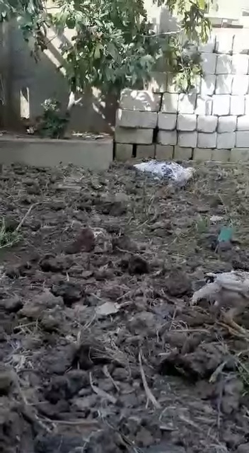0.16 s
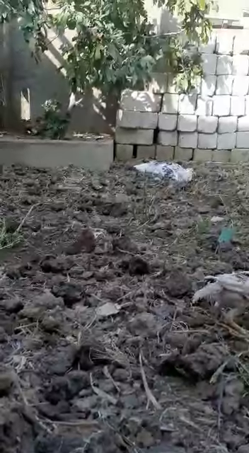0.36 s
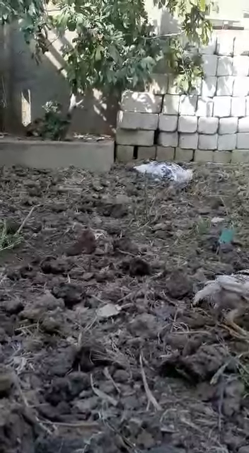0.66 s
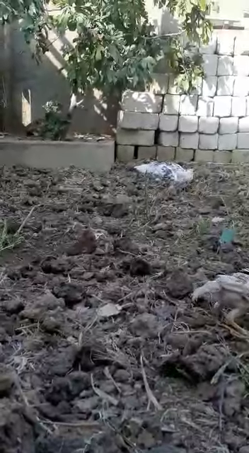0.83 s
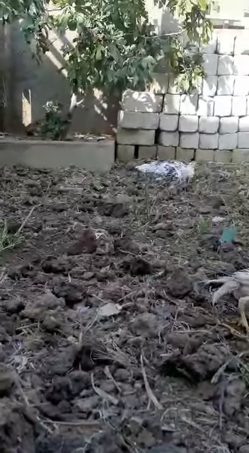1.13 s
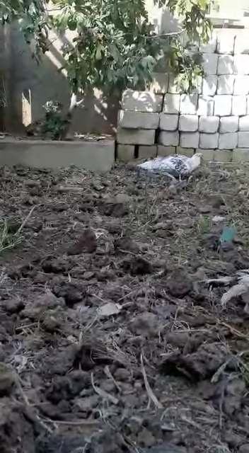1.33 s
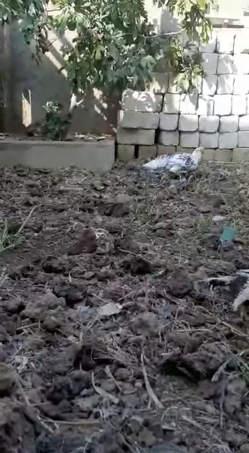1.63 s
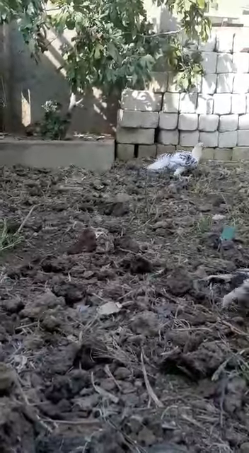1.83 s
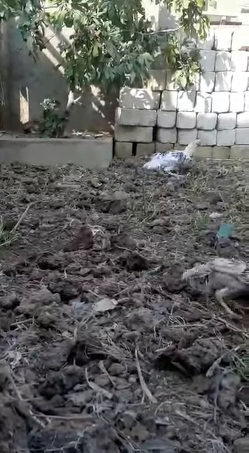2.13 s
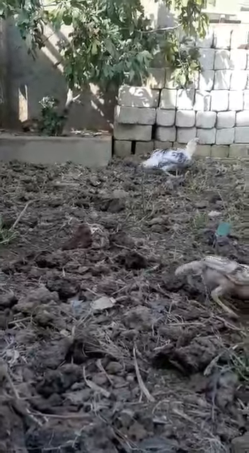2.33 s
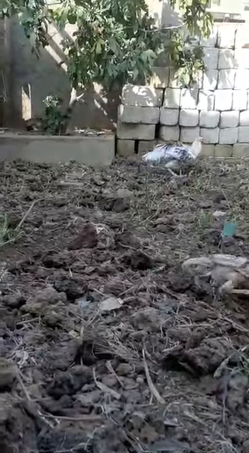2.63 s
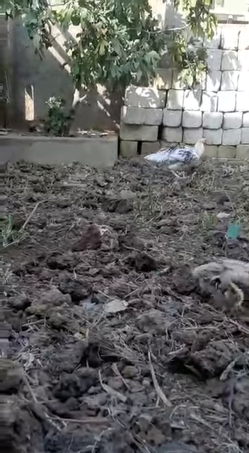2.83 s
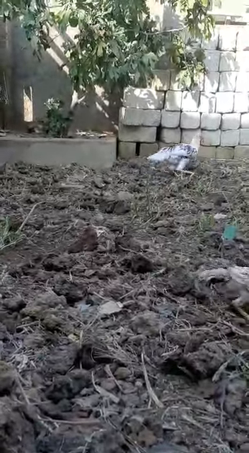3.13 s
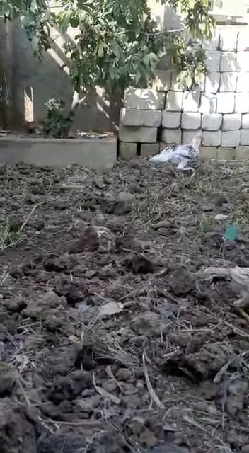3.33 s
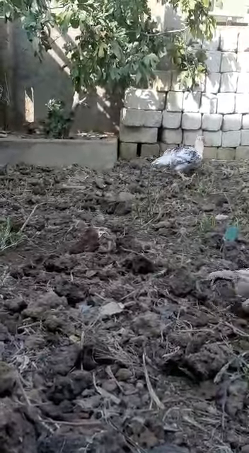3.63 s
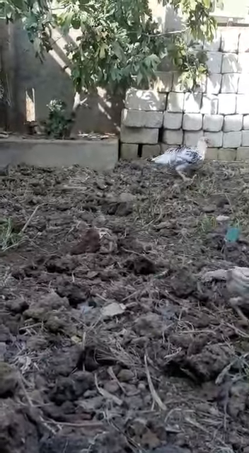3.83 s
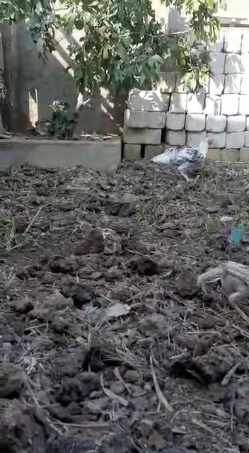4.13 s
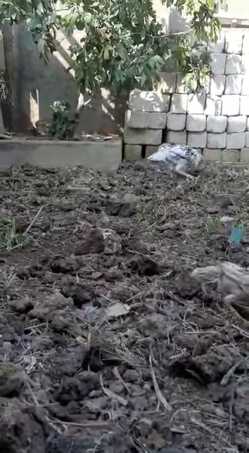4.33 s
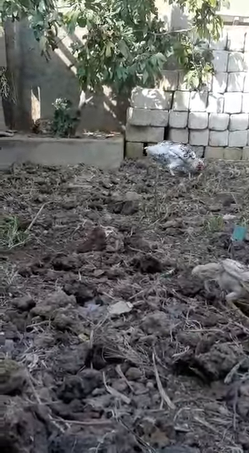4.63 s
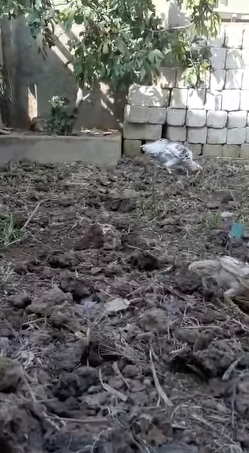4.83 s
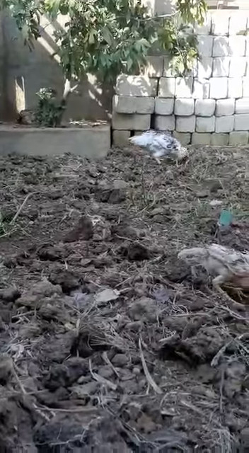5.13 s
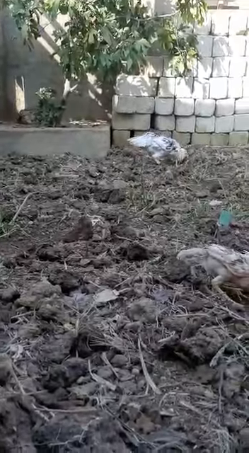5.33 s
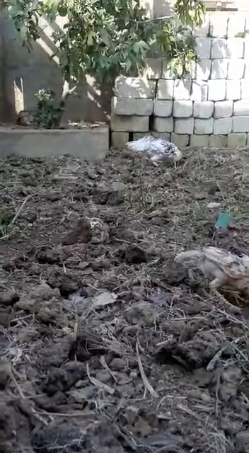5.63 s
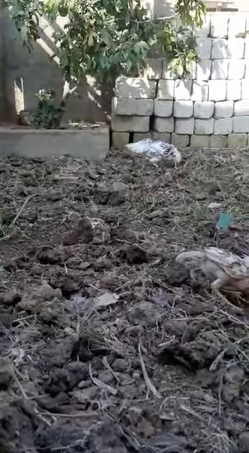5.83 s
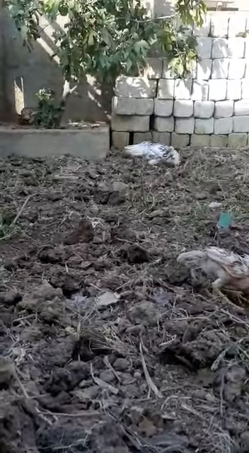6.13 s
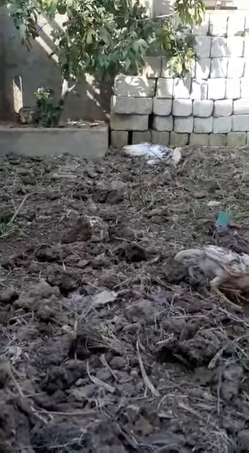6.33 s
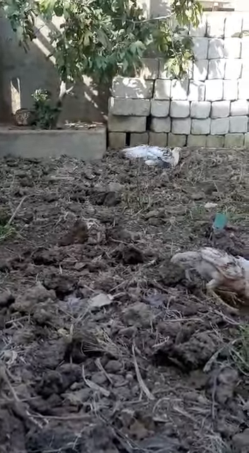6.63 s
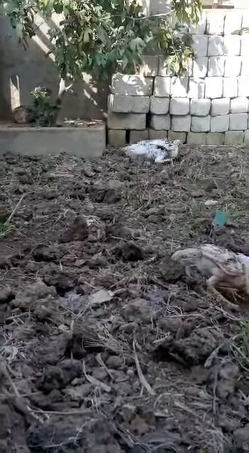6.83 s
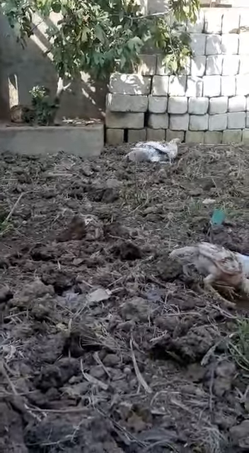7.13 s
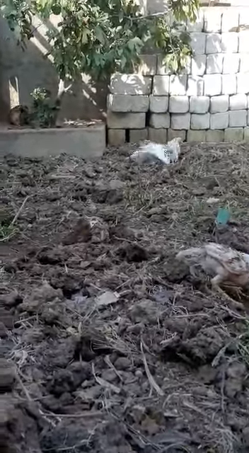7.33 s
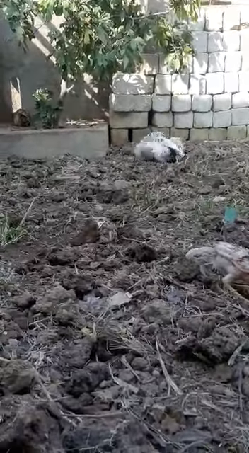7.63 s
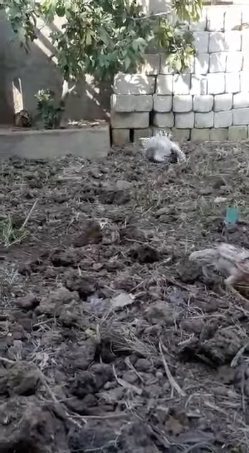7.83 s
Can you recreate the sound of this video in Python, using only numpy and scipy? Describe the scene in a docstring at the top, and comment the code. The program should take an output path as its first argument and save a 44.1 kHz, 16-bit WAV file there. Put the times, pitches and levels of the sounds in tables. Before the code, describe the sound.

In a quiet walled yard, young chickens give short hoarse clucks, then a loud squawk that stretches into a clear, lower whine. A small distant bird whistles thin chirps during a lull. Clucking resumes and thickens, a second squawk and whine follow, then spaced clucks continue until a third squawk near the end amid scratching feet and rustling leaves. Close stereo pickup, slightly duller on the left, with short wall reflections.

```python
"""Young chickens forage close by in a small walled yard, duller in the left channel of the microphone pair.
They cluck hoarsely: unevenly flapping membranes ring a throat resonance. Three times they squawk, twice drawn
out into a clear, lower whine, both built from membrane harmonics; the same voice croons softly, beak shut.
Feet rake dry litter in bursts of grainy noise among low thumps; further off a small bird whistles chirps.
The block walls answer with decaying noise, over a faint outdoor hush of coloured noise."""
import sys
import numpy as np
from scipy import signal
from scipy.fft import rfft, irfft, next_fast_len
from scipy.io import wavfile
from scipy.ndimage import uniform_filter1d, map_coordinates

SR = 44100
rng = np.random.default_rng(int(sys.argv[2]) if len(sys.argv) > 2 else 0)


def store_wav(level_fs):
    """Save 16-bit WAV to argv[1]."""
    pcm = np.round(np.clip(np.atleast_2d(level_fs), -1, 1) * 32767)
    wavfile.write(sys.argv[1], SR, pcm.T.astype(np.int16))


N = 351477
TOP_HZ = 15780  # nothing is kept above this

# Source levels below are taken before the channel and wall gains of the place.
# "Burst length" is twice the time a burst takes to fall from its peak to 1/e.

# Outdoor hush: spectra of the low rumble and the high hiss. Each row: frequency in Hz, relative level in dB.
RUMBLE_COLOUR = [(20, -38), (32, -20), (50, 4.5), (75, -1.5), (170, -3), (300, -16), (480, -19.5),
                 (1000, -28.5), (2500, -52), (8000, -70)]
HISS_COLOUR = [(400, -7), (1100, -7.5), (1550, 8.5), (1800, -3.5), (2100, 1.5), (2600, -15), (3500, -7),
               (6400, -6), (8400, -27), (11500, -15), (15500, -12)]
# Their drift, before a random waver. Each row: time in seconds, level in dB.
RUMBLE_DRIFT = [(0, -63), (1.1, -59.5), (2.5, -64), (3.7, -59.5), (5.9, -61), (6.5, -66.5), (7.4, -59)]
HISS_DRIFT = [(0, -61), (2.5, -65.5), (6.299, -70.5), (7.97, -61.5)]

# Decay of the answer from the walls. Each row: frequency in Hz, time to fall by 60 dB in seconds.
WALL_DECAY = [(200, 0.66), (800, 0.3), (2100, 0.33), (5500, 0.26), (12000, 0.2)]

# Far chirps. Each row: time of the top pitch in seconds, length after it in seconds, top pitch in Hz, level in dB.
FAR_CHIRPS = [(0.485, 0.049, 3350, -63), (1.872, 0.037, 3560, -61.5), (1.908, 0.044, 2710, -55.5),
              (2.013, .052, 3700, -60.5), (2.066, .045, 2730, -59), (2.214, 0.07, 3820, -51),
              (2.219, 0.022, 2750, -59), (2.399, 0.0414, 3380, -62), (2.456, 0.025, 2662, -57.5),
              (2.542, .039, 3500, -59.5), (2.691, 0.027, 3274, -56), (2.847, 0.028, 3470, -59),
              (2.906, 0.063, 5230, -60)]
CHIRP_FALL, CHIRP_FLICK = 0.68, 0.78  # end and start pitch over the top pitch
CHIRP_FLICK_S = 0.013  # time of the upward flick

# Dull low thumps, claws scraping soil and dry leaves rustling.
# Each row: loudest moment in seconds, level in dB, burst length in seconds.
LOW_THUMPS = [(.1, -54, 0.19), (.535, -58, 0.046), (1.099, -55, 0.083), (2.667, -58.5, .15),
              (7.502, -47, 0.17), (7.66, -53.5, 0.24), (7.902, -49.5, 0.0473)]
CLAW_SCRAPES = [(.078, -57.5, 0.24), (2.667, -67, 0.18), (5.822, -39.5, 0.096), (6.85, -59, .2),
                (7.325, -37.5, 0.034)]
LEAF_RUSTLES = [(1.097, -39, .085), (1.222, -57, .04), (1.315, -54, 0.1), (2.667, -62, .15),
                (7.325, -52, .037), (7.643, -50.5, 0.16), (7.731, -46.5, .13), (7.895, -46.5, 0.095),
                (7.95, -49, 0.12)]
# Spectra of the thumps, soil and leaves. Each row: frequency in Hz, relative level in dB.
THUMP_COLOUR = [(30, -28), (60, -3), (170, -2.5), (290, 1), (430, -6.5), (1000, -21), (3000, -63.5)]
SOIL_COLOUR = [(100, -29), (300, -4.5), (560, -0.5), (1200, -3.5), (2200, -4.5), (3500, -11.5),
               (6500, -18.5), (8600, -49.5), (16000, -44)]
LEAF_COLOUR = [(800, -60), (2500, 4), (6500, 3.5), (8600, -11), (11500, -3.5), (15500, -8.5)]
SCRAPE_THUMP_DB, RUSTLE_SOIL_DB = -15, -7.5  # a scrape also shakes the ground; a rustle also stirs the soil

# Soft croons. Each row: middle in seconds, length in seconds, first pitch in Hz, last pitch in Hz, level in dB.
SOFT_CROONS = [(0.331, 0.31, 236.3, 274.8, -54.5), (0.469, 0.17, 320.4, 313, -55.5),
               (3.56, .3, 149, 158, -48), (3.731, 0.19, 285.3, 253.7, -49), (3.926, 0.38, 232.4, 251, -49)]

# Hoarse clucks, then the harsh rasping catches within the long calls.
# Each row: loudest moment in seconds, level in dB, throat resonance in Hz.
HOARSE_CLUCKS = [(.052, -28.5, 1260), (.754, -35, 1273), (.963, -31, 1300), (3.039, -33.5, 1070),
                 (3.258, -36, 1195), (3.33, -28.5, 890), (3.53, -22.5, 1009), (3.772, -27.5, 1200),
                 (3.815, -25.5, 1167), (4.158, -25, 850), (4.725, -29, 1275), (4.958, -31.5, 1324),
                 (5.187, -32, 1263), (5.439, -29.5, 1180), (5.485, -31, 878), (5.684, -32.5, 853),
                 (5.922, -30.5, 833), (6.171, -36, 823), (7.305, -42.5, 1210), (7.336, -34.5, 762.9),
                 (7.862, -27.5, 1080)]
HARSH_CATCHES = [(1.275, -20.5, 1053), (4.268, -23, 990), (7.452, -23, 1290)]
# Spectra of a cluck's rasp and its body. Each row: frequency in Hz, relative level in dB.
RASP_COLOUR = [(1000, -37.5), (1800, 6.5), (2150, 5), (2600, -7), (3100, -9), (3700, -10), (4500, -12.5),
               (6200, -13.5), (7300, -24), (8600, -43.5), (12000, -30.5), (16000, -43)]
BODY_COLOUR = [(80, -31), (270, -1), (400, 4), (600, -5), (850, -0.5), (1100, -1), (1500, 1), (1800, -4),
               (2600, -29.5)]
CLUCK_S = .055  # burst length of every cluck
# rasp of a cluck of average level with a 1 kHz throat, and how it grows in lower and louder clucks
RASP_DB, RASP_DB_PER_OCTAVE, RASP_PER_DB = -10.5, -9.5, 0.53
CATCH_RASP_DB = 1.5
THROAT_CLIMB_OCT_PER_S = 1.5  # the throat resonance climbs through each cluck
# width of each resonance pole at 1 kHz, and its power law: a higher, more open throat is more damped
THROAT_WIDTH_HZ, WIDTH_GROWS = 392, 1.3

# The two whines, one list each. Each row: time in seconds, pitch in Hz, level in dB.
WHINE_PATHS = [
    [(1.305, 568, -32), (1.319, 597.3, -32.5), (1.381, 600.7, -27), (1.433, 588.4, -35),
     (1.479, 574.6, -32), (1.581, 571.5, -31.5), (1.595, 578, -34)],
    [(4.29, 587.7, -40.5), (4.346, 579, -31.5), (4.4, 593.4, -39.5), (4.448, 587.2, -31),
     (4.51, 584.4, -38.5), (4.606, 601.3, -31), (4.615, 604, -28)],
]
# Throat of a whine. Each row: frequency in Hz, relative level in dB.
WHINE_COLOUR = [(250, -18), (590, -2.5), (1180, 6.5), (1750, -9.5), (2350, -6.5), (2930, -8), (3500, -3),
                (4100, -15), (5250, -11.5), (5850, -27), (6500, -20), (7500, -41), (8600, -43.5),
                (14000, -40)]
WHINE_ROUGH = (0.26, 0.036, 0.39)  # roughness 0-1: at the onset, held, at the break-up
WHINE_CLEARS_S, WHINE_BREAK_S = 0.028, 0.02  # the voice locks in, and falls apart at the end
WHINE_TREBLE_DB, WHINE_ARCH_DB = -34, 4  # level above 1.8 kHz at the ends, and its lift in mid call

# Squawks. Each row: start in seconds, attack in seconds, length in seconds, peak level in dB, starting pitch in Hz,
# settled pitch in Hz, moment of widest beak in seconds, level above 1.8 kHz then, in dB relative to the rest.
SQUAWK_CALLS = [(1.002, 0.032, 0.265, -20, 691, 663.2, 1.23, -0.5),
                (3.825, .042, .25, -18.5, 650.3, 619.7, 3.956, -11),
                (7.346, .07, 0.342, -24, 673.4, 735.7, 7.47, -7)]
# The throat is held differently for each squawk, one list each. Each row: frequency in Hz, relative level in dB.
SQUAWK_COLOURS = [
    [(250, -34), (670, -27), (1000, -8.5), (1340, -0.5), (1670, -1.5), (2000, -12), (2330, -9), (2700, -23),
     (3330, -17.5), (3670, -13.5), (4400, -23.5), (6700, -20), (8400, -42), (11500, -36.5), (15500, -45)],
    [(250, -46.5), (620, -30.5), (950, -13.5), (1250, 1), (1560, 0), (1870, -21), (2250, -17),
     (3100, -23.5), (3750, -19.5), (4400, -33), (5000, -25), (6900, -28), (8400, -48), (12000, -44.5)],
    [(250, -37), (730, -19), (900, -8.5), (1100, 3), (1460, -1), (1830, -26), (2280, -6), (2600, -17.5),
     (3700, -14), (4300, -23), (6500, -23), (8400, -50), (12000, -43)],
]
SQUAWK_RISE_DB, SQUAWK_SAG_DB_PER_S = 12, 43.5  # climb during the attack, then the breath runs down
SQUAWK_SETTLE = 1.5  # time the pitch takes to settle, in attack times
SQUAWK_ROUGH = (.46, .18, .6)  # roughness 0-1: at the onset, held, at the break-up
SQUAWK_CLEARS_S, SQUAWK_BREAK_S = .08, .055  # the voice clears, and falls apart at the end
SQUAWK_RELEASE_DB = 4  # level lost as it falls apart
BEAK_DB_PER_S = 56  # the edge grows as the beak widens and fades as it shuts


def amp(db):
    """Decibels to gain."""
    return 10 ** (np.asarray(db) / 20)


def unit(x):
    """Scale to rms 1."""
    return x / np.sqrt(np.mean(x ** 2) + 1e-20)


def along(points, hz):
    """Read (Hz, value) points on a log frequency axis."""
    f, v = np.transpose(points)
    return np.interp(np.log(hz + 1), np.log(f + 1), v)


def filtered(x, response):
    """Multiply the spectrum of x by a response of frequency."""
    n = x.shape[-1]
    m = next_fast_len(n + 4096)  # spare room for the filter's ringing
    return irfft(rfft(x, m) * response(np.fft.rfftfreq(m, 1 / SR)), m)[..., :n]


def coloured(x, spectrum):
    """Give x a (Hz, dB) colour, at rms 1."""
    return unit(filtered(x, lambda hz: amp(along(spectrum, hz))))


def wobble(n, rate):
    """A smooth random curve of n samples, rate knots a second."""
    knots = rng.standard_normal(int(n * rate / SR) + 4)
    return map_coordinates(knots, [np.arange(n) * rate / SR])


def curves(rows):
    """Sample times, then one value per sample for each column."""
    s, *cols = np.transpose(rows)
    t = np.arange(round(s[0] * SR), round(s[-1] * SR)) / SR
    return [t] + [np.interp(t, s, c) for c in cols]


def over_time(rows):
    """Read (s, value) points across the whole scene."""
    return np.interp(np.arange(N) / SR, *np.transpose(rows))


def fade(t, edge):
    """Soft start and stop, each lasting edge seconds."""
    return np.sin(np.pi / 2 * np.clip(np.minimum(t - t[0], t[-1] - t) / edge, 0, 1))


def swell(s, length, rise):
    """Times and envelope of a burst that peaks at s; rise is its attack as a share of the length."""
    t = np.arange(-SR // 8, SR // 4) / SR
    side_s = np.where(t < 0, rise * length, length / 2)
    return s + t, np.exp(-np.abs(t / side_s) ** 2.4)


def add(track, t, sound):
    """Mix a sound in at its times."""
    at = round(t[0] * SR) + np.arange(len(t))
    inside = (at >= 0) & (at < N)
    track[at[inside]] += sound[inside]


def background():
    """A distant rumble, mostly shared by both channels and stronger on the right, under a faint wide hiss."""
    mid, side = coloured(rng.standard_normal((2, N)), RUMBLE_COLOUR)
    rumble_db = over_time(RUMBLE_DRIFT) + 3.4 * wobble(N, 5.5)
    rumble = amp(rumble_db) * np.array([1.0 * mid + 0.34 * side, 1.55 * mid - 0.22 * side])
    hiss_db = over_time(HISS_DRIFT) + 1.2 * wobble(N, 4.7)
    hiss = amp(hiss_db) * amp([[-1.5], [1.5]]) * coloured(rng.standard_normal((2, N)), HISS_COLOUR)
    return rumble + hiss


def placed(x, left_db, right_db, wet_db, shade_db, shade_hz):
    """Direct sound, dulled on the left mainly from shade_hz to 7 kHz, and the diffuse answer of the walls."""
    hz, t, z = signal.stft(rng.standard_normal((2, SR // 2)), SR, nperseg=256)
    decay = amp(-60 * t / along(WALL_DECAY, hz)[:, None])
    tail = signal.istft(z * decay, SR, nperseg=256)[1]
    late = np.pad(x, (round(.007 * SR), 0))[None]  # the walls answer 7 ms later
    walls = signal.fftconvolve(late, tail / np.linalg.norm(tail[0]), axes=1)[:, :N]

    def left_path(hz):
        shade = shade_db * along([(600, 0), (shade_hz, 1), (7000, 1), (11000, 0)], hz)
        return amp(left_db + shade) * np.exp(2j * np.pi * hz * 2 / SR)  # left leads by two samples

    direct = np.array([filtered(x, left_path), amp(right_db) * x])
    return direct + amp(wet_db) * amp([[-3], [3]]) * walls


def chirps(quaver=0.033, overtone=0.09):
    """Thin, slightly scratchy whistles: a sine and its octave flick up and slide down."""
    out = np.zeros(N)
    for s, length, top_hz, db in FAR_CHIRPS:
        start = (s - CHIRP_FLICK_S, CHIRP_FLICK * top_hz)
        t, hz = curves([start, (s, top_hz), (s + length, CHIRP_FALL * top_hz)])
        phase = 2 * np.pi * np.cumsum(hz * (1 + quaver * wobble(len(t), 906))) / SR
        whistle = np.sin(phase) + overtone * np.sin(2 * phase)
        add(out, t, amp(db) * fade(t, length / 2) * whistle)
    return out


def grain_bursts(rows, spectrum, grain_db, rise):
    """One quick swell of clumped tiny grains of noise for each row."""
    out = np.zeros(N)
    for s, db, length in rows:
        t, envelope = swell(s, length, rise)
        grains = rng.standard_normal(len(t)) * amp(grain_db * wobble(len(t), 600))
        add(out, t, amp(db) * envelope * coloured(grains, spectrum))
    return out


def thumps_and_raking():
    """Low thumps sound and claws drag through crumbly soil and crisp leaves, drawn anew in each channel."""
    thumps = grain_bursts(LOW_THUMPS, THUMP_COLOUR, grain_db=3, rise=.25)
    thumps += amp(SCRAPE_THUMP_DB) * grain_bursts(CLAW_SCRAPES, THUMP_COLOUR, grain_db=-2, rise=0.14)
    soil = grain_bursts(CLAW_SCRAPES, SOIL_COLOUR, grain_db=1, rise=0.27)
    soil += amp(RUSTLE_SOIL_DB) * grain_bursts(LEAF_RUSTLES, SOIL_COLOUR, grain_db=4.5, rise=.2)
    leaves = np.array([grain_bursts(LEAF_RUSTLES, LEAF_COLOUR, grain_db=2.0, rise=.13) for _ in range(2)])
    return thumps, soil, leaves


def syrinx(pitch, rough, throat, doubling, jitter, hiss):
    """Membrane harmonics shaped by the throat; unequal alternate cycles add lines halfway between them."""
    n = len(pitch)
    hz = pitch * (1 + jitter * rough * wobble(n, 330) + 0.0025 * wobble(n, 25.55))
    hz = hz * (1 + .045 * rough * wobble(n, 55))  # a hoarse voice also lurches in pitch
    phase = 2 * np.pi * np.cumsum(hz) / SR
    tone = np.zeros(n)
    for k in np.arange(1, int(2 * TOP_HZ / pitch.max())) / 2:
        level_db = along(throat, k * pitch) + 1.9 * wobble(n, 14.1)  # each partial wavers as the head moves
        order = np.exp(-4 * rough ** 2 * max(k - 3, 0))  # hoarseness dissolves the upper partials first
        share = doubling if k % 1 else 1
        tone += amp(level_db) * order * share * np.sin(k * phase + rng.uniform(0, 2 * np.pi))
    turbulence = coloured(rng.standard_normal(n) * (1 + np.cos(phase)), throat)  # breath pulses with each cycle
    return unit(tone) + hiss * rough * turbulence


def croons():
    """A contented bird hums with its beak shut; each note swells, glides and fades."""
    out = np.zeros(N)
    shut_beak = [(90, -26.0), (160, -4.5), (260, -1.0), (400, -15.0), (560, -3.0),
                 (780, -5), (1050, -10), (1600, -40), (4000, -48.5)]  # (Hz, dB)
    for s, length, from_hz, to_hz, db in SOFT_CROONS:
        t, pitch = curves([(s - length / 2, from_hz), (s + length / 2, to_hz)])
        hum = unit(syrinx(pitch, 0.35, shut_beak, doubling=0.12, jitter=0.18, hiss=3.0))
        add(out, t, amp(db) * fade(t, length / 2) * hum)
    return out


def cluck(s, db, throat_hz, rasp_db, flap_hz=268, arch=.13, rise=.5):
    """Slack membranes flap unevenly and ring the throat; both rise and sink as the beak opens and shuts."""
    out = np.zeros(N)
    scatter, breathy = .085, .22
    t, envelope = swell(s, CLUCK_S, rise)
    n = len(t)
    opening = 1 + arch * (envelope - .75)
    flap_rate = flap_hz * opening * np.exp(scatter * (wobble(n, 200) + rng.normal()))
    clicks = np.diff(np.floor(np.cumsum(flap_rate) / SR), prepend=0)  # one click a cycle
    flaps = unit(clicks * amp(1 * wobble(n, 147.8))) + breathy * rng.standard_normal(n)
    # shift the moving resonance down to 0 Hz, filter, and shift it back
    resonance_hz = throat_hz * opening * 2 ** (THROAT_CLIMB_OCT_PER_S * (t - s))
    turn = np.exp(2j * np.pi * np.cumsum(resonance_hz) / SR)
    pole = np.exp(-np.pi * THROAT_WIDTH_HZ * (throat_hz / 10 ** 3) ** WIDTH_GROWS / SR)
    ring = (turn * signal.lfilter([1], np.poly([pole, pole]), flaps / turn)).real  # double pole: steep skirts
    spacing_hz = 1220 * np.exp(.12 * rng.normal())  # the windpipe's upper resonances shift with the neck
    piped = filtered(flaps, lambda hz: 1 / (1 - .45 * np.exp(-2j * np.pi * hz / spacing_hz)))
    edge = amp(rasp_db) * np.sqrt(envelope) * coloured(piped, RASP_COLOUR)  # rasp comes only with effort
    sound = envelope * (coloured(ring, BODY_COLOUR) + edge)
    add(out, t, amp(db) * sound * np.linalg.norm(envelope) / np.linalg.norm(sound))
    return out


def clucks():
    """Single clucks, raspier when low or loud, and the harsh rasping catches within the long calls."""
    usual_db = np.mean([db for _, db, _ in HOARSE_CLUCKS])
    out = np.zeros(N)
    for s, db, throat_hz in HOARSE_CLUCKS:
        octaves = np.log2(throat_hz / 10 ** 3)
        rasp_db = RASP_DB + RASP_DB_PER_OCTAVE * octaves + RASP_PER_DB * (db - usual_db)
        out += cluck(s, db, throat_hz, rasp_db)
    for s, db, throat_hz in HARSH_CATCHES:
        out += cluck(s, db, throat_hz, CATCH_RASP_DB)
    return out


def hoarseness(t, stages, clears_s, break_s):
    """A call starts rough, clears as the membranes lock in and breaks up at its end."""
    onset, held, end = np.clip(stages, 0, 1)
    starting = np.exp(-((t - t[0]) / clears_s) ** 2)
    ending = np.exp(-((t[-1] - t) / break_s) ** 2)
    return held + (onset - held) * starting + (end - held) * ending


def levelled(x):
    """Even out the level over 25 ms."""
    return x / np.sqrt(np.abs(uniform_filter1d(x ** 2, size=SR // 40)) + 1e-20)


def call(t, voice, db, edge_db):
    """The breath sets a call's level, and a wider beak lets out more of the upper harmonics."""
    out = np.zeros(N)
    low = filtered(voice, lambda hz: 1 / (1 + (hz / 1800) ** 16))
    edge = amp(edge_db) * levelled(voice - low)
    add(out, t, amp(db) * fade(t, 0.006) * (levelled(low) + edge))
    return out


def whines():
    """A clear, nearly level note of membrane harmonics, its treble strongest in mid call."""
    out = np.zeros(N)
    for rows in WHINE_PATHS:
        t, pitch, db = curves(rows)
        rough = hoarseness(t, WHINE_ROUGH, WHINE_CLEARS_S, WHINE_BREAK_S)
        voice = syrinx(pitch, rough, WHINE_COLOUR, doubling=.015, jitter=0.053, hiss=1.5)
        treble_db = WHINE_TREBLE_DB + WHINE_ARCH_DB * fade(t, (t[-1] - t[0]) / 2)
        out += call(t, voice, db, treble_db - db)
    return out


def squawks(stutter_db=4):
    """Each squawk bursts out, stutters while hoarse, settles on a pitch and sags as the breath runs down."""
    out = np.zeros(N)
    for row, throat in zip(SQUAWK_CALLS, SQUAWK_COLOURS):
        s, attack, length, peak_db, from_hz, to_hz, widest, edge_db = row
        age = np.arange(round(length * SR)) / SR
        t = s + age
        pitch = to_hz + (from_hz - to_hz) * np.exp(-(age / (SQUAWK_SETTLE * attack)) ** 2)
        rough = hoarseness(t, SQUAWK_ROUGH, SQUAWK_CLEARS_S, SQUAWK_BREAK_S)
        db = peak_db - np.maximum(SQUAWK_RISE_DB * (1 - age / attack), SQUAWK_SAG_DB_PER_S * (age - attack))
        db = db - SQUAWK_RELEASE_DB * np.exp(-((length - age) / SQUAWK_BREAK_S) ** 2)
        voice = syrinx(pitch, rough, throat, doubling=.36, jitter=.022, hiss=1.0)
        stutter = stutter_db * rough * wobble(len(t), 70)
        out += call(t, voice, db + stutter, edge_db - BEAK_DB_PER_S * np.abs(t - widest))
    return out


def scene():
    """All the birds and the yard around them."""
    thumps, soil, leaves = thumps_and_raking()
    far = placed(chirps(), left_db=-3, right_db=4, wet_db=-5.5, shade_db=-1.5, shade_hz=1300)
    scraping = placed(soil, left_db=-2, right_db=2.5, wet_db=-2.5, shade_db=-8, shade_hz=1300)
    near = placed(thumps + croons(), left_db=1.5, right_db=2.5, wet_db=-10.5, shade_db=-4, shade_hz=1300)
    clucking = placed(clucks(), left_db=-5.5, right_db=-4.5, wet_db=-6, shade_db=-12, shade_hz=1400)
    whining = placed(whines(), left_db=2, right_db=-1.5, wet_db=-2.5, shade_db=-22, shade_hz=2600)
    squawking = placed(squawks(), left_db=2.5, right_db=2.0, wet_db=-3.5, shade_db=-10, shade_hz=1310)
    return background() + far + leaves + scraping + near + clucking + whining + squawking


def record(dry):
    """Nothing is kept above the band limit."""
    return filtered(dry, lambda hz: hz < TOP_HZ)


dry = scene()
out = record(dry)
store_wav(out)
```